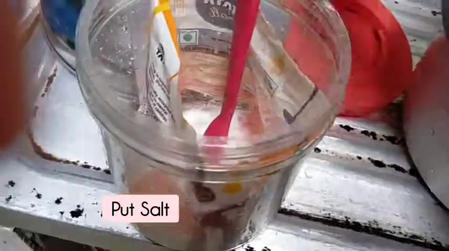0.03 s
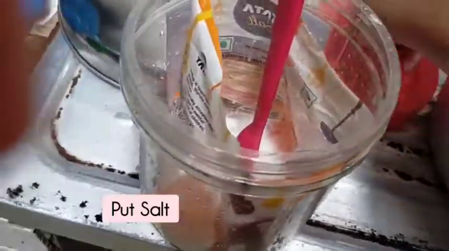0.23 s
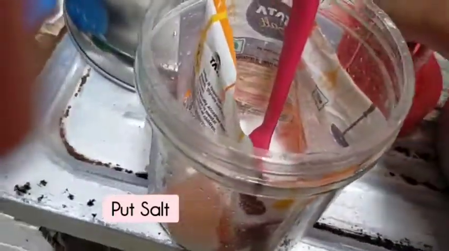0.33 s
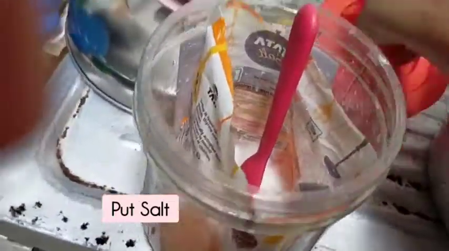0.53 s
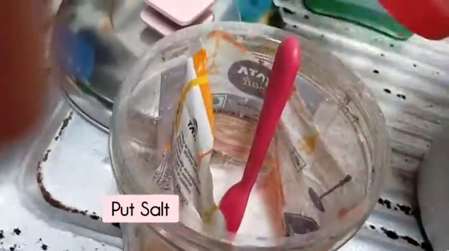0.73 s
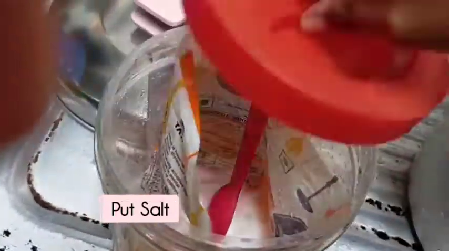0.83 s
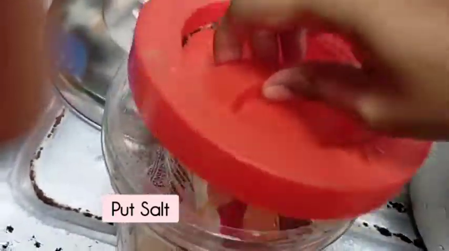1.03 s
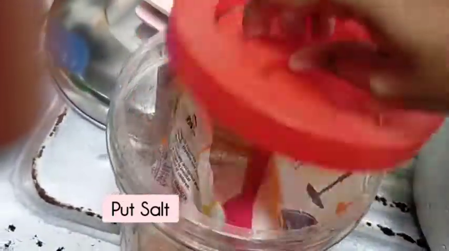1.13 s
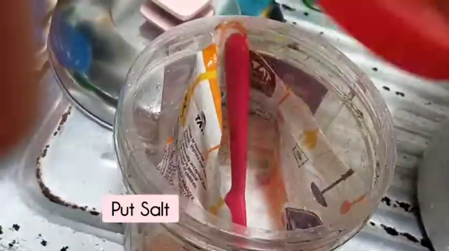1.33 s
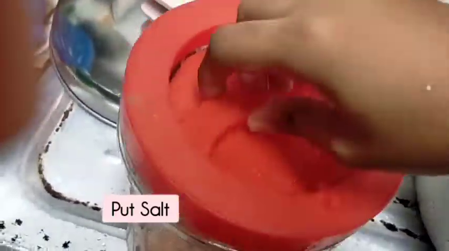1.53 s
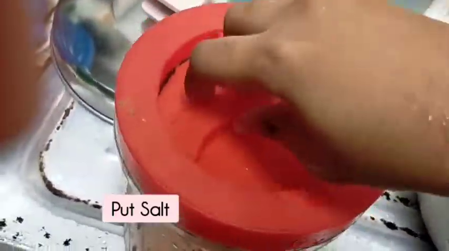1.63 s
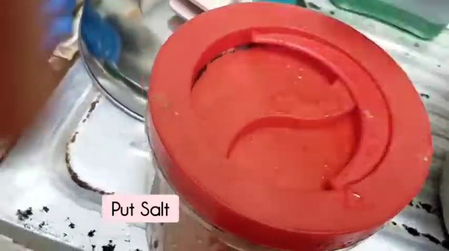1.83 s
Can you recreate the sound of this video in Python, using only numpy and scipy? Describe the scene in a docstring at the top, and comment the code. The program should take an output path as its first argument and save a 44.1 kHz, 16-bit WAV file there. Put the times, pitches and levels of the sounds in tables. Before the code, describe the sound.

A plastic lid scrapes and squeaks briefly across a steel surface, clacks against the rim of a plastic jar, then is pressed on with hollow knocks and a snap. It is heard close up in a small, quiet kitchen.

```python
"""A small, quiet kitchen. A plastic lid is dragged off a steel draining board: its edge grinds over
the steel and squeaks as it sticks and slips. The lid knocks against the rim of an open plastic jar,
brushes past it, then is set on top and pressed home with a few hollow knocks and a sharp snap.
Friction is a spray of micro-slips; each knock rings lid and rim. Worktop and walls add a short tail."""
import sys
import numpy as np
from scipy import signal
from scipy.fft import rfft, irfft, next_fast_len
from scipy.io import wavfile

SR = 44100
rng = np.random.default_rng(int(sys.argv[2]) if len(sys.argv) > 2 else 0)


def dump_mix(stems):
    """Bounce the given channels to the path in sys.argv[1] as a 16-bit WAV at rate SR."""
    frames = np.atleast_2d(stems).T  # one column per channel
    limited = np.clip(frames, -1, 1)  # hard clip at full scale
    pcm = np.round(limited * 32767).astype(np.int16)
    wavfile.write(sys.argv[1], SR, pcm)


N = 83790
T = np.arange(N) / SR


def from_db(db):
    """Decibels to gain."""
    return 10 ** (np.asarray(db) / 20)


def unit_rms(x):
    """Scale to an rms of 1."""
    return x / np.sqrt(np.mean(x ** 2) + 1e-20)


def eq(x, curve):
    """Minimum-phase EQ along a curve of (f/Hz, level/dB); white noise keeps its level."""
    size = 2 * next_fast_len(N)
    hz, db = np.transpose(curve)
    log_hz = np.log(np.fft.rfftfreq(size, 1 / SR) + 1)
    gain = unit_rms(from_db(np.interp(log_hz, np.log(hz), db)))
    cepstrum = irfft(np.log(gain))
    cepstrum[1:size // 2] *= 2  # folded forward, so nothing rings ahead of a hit
    cepstrum[size // 2 + 1:] = 0
    return irfft(rfft(x, size) * np.exp(rfft(cepstrum)), size)[:N]


def decay(start, t60):
    """Envelope that jumps to 1 and dies away."""
    return (T >= start) * from_db(-60 * np.clip((T - start) / t60, 0, 10))


def struck(start, hz, t60):
    """One struck mode: a decaying sine."""
    return decay(start, t60) * np.sin(2 * np.pi * hz * (T - start))


def resonate(x, hz, t60):
    """One driven mode; white noise keeps its level."""
    radius = from_db(-60 / (t60 * SR))
    zeros = np.sqrt((1 - radius ** 2) / 2) * np.array([1, 0, -1])
    poles = [1, -2 * radius * np.cos(2 * np.pi * hz / SR), radius ** 2]
    return signal.lfilter(zeros, poles, x + 1e-18)


def wobble(rate_hz):
    """Random modulator gliding between values of spread 1."""
    return np.interp(T * rate_hz, np.arange(N), rng.standard_normal(N))


def grains(per_s=6000, spread_db=2.5):
    """Dense, uneven micro-slips of friction; rms 1."""
    sizes = from_db(spread_db * np.minimum(rng.exponential(1, N), 4)) * rng.choice([-1, 1], N)
    return unit_rms(sizes * (rng.random(N) < per_s / SR))


# EQ of the kitchen's background: f/Hz, level/dB
ROOM_TONE_EQ = [(25, 2.5), (55, -0.5), (85, -3.5), (140, -1), (220, -7.5), (350, -3), (1400, -12),
                (2600, -16.5), (4300, -25.5), (5200, -33), (7700, -27.5), (9500, -37.5), (12500, -33),
                (15200, -25)]


def room_tone():
    """A faint, steady bed of dark noise."""
    return from_db(-56.5) * eq(rng.standard_normal(N), ROOM_TONE_EQ)


# how hard the lid rubs on the steel: t/s, grind level/dB, hiss level/dB
DRAG = [(0.199, -65.5, -80), (0.214, -34.5, -46), (0.223, -41.5, -48), (0.23, -28.5, -31),
        (.255, -31.5, -37.5), (0.271, -39, -45), (.32, -38.5, -49.5), (0.332, -28, -49), (0.345, -40, -66),
        (.398, -45.5, -81), (0.427, -46, -46), (0.438, -30, -28), (.452, -31.5, -37), (0.467, -40.5, -48),
        (0.519, -46, -78)]
# EQ of the grind: f/Hz, level/dB
GRIND_EQ = [(40, -37.5), (140, 0), (250, -3.5), (400, -4), (560, 5), (950, 1), (1900, -1.5), (2800, -7),
            (5200, -34), (7700, -40), (11000, -59)]
# resonances of lid and board: f/Hz, level/dB, t60/s
BOARD_MODES = [(141, -12.5, 0.11), (593, -15.5, 0.078), (705, -26, 0.29), (855, -16.5, 0.04),
               (1050, -16, 0.048), (1186, -8, 0.048), (1820, -8, 0.027)]
# bright EQ of the tiny slips, in the scrape's hiss and in the squeaks: f/Hz, level/dB
RASP_EQ = [(1500, -24), (3500, -22), (5500, -5), (7600, 16.5), (9200, 5), (12000, -0.5), (15000, 14.5)]


def scrape():
    """The lid's edge grinds and hisses over the steel and shakes the resonances of both."""
    times, *levels = np.transpose(DRAG)
    grind, hiss = [from_db(np.interp(T, times, db, left=-120, right=-120)) for db in levels]
    friction = grind * grains()
    body = sum(from_db(db) * resonate(friction, hz, t60) for hz, db, t60 in BOARD_MODES)
    return from_db(3) * eq(friction, GRIND_EQ) + body + eq(hiss * grains(), RASP_EQ)


# squeak cues: t/s, length/s, level/dB, f/Hz, rasp relative to the squeak/dB, catch level/dB
SQUEAKS = [(.208, 0.012, -35, 1825, -15.5, -55), (.2255, 0.011, -17, 1758, -22.5, -54),
           (0.2375, 0.0089, -17, 1742, -14.5, -39), (.2505, 0.004, -13, 1791, -16, -32.5),
           (.287, 0.0058, -25, 1820, -14.5, -41), (.3265, 0.0038, -17.5, 1803, -32, -30.5),
           (.349, 0.0036, -26, 1876, -34, -37.5), (.374, 0.006, -27, 1841, -34, -35),
           (.4352, 0.0025, -24.5, 1802, -13, -21), (.4385, 0.0056, -12, 1771, -25, -42),
           (.4475, 0.0022, -20, 1830, -5, -28)]
# EQ of the click as the edge catches: f/Hz, level/dB
CATCH_EQ = [(1000, -2), (2900, 6), (4300, -0.5), (6000, -14), (11000, -39)]


def squeaks(attack_s=0.002, release_s=0.0013, pitch_jitter=0.03, flutter_db=1.5):
    """The edge catches with a click, then sticks and slips: a wavering tone with one tiny slip a cycle."""
    level, rasp, catch = np.zeros((3, N))
    starts, _, _, pitches, _, _ = np.transpose(SQUEAKS)
    hz = np.interp(T, starts, pitches) * (1 + pitch_jitter * wobble(500))
    cycles = np.cumsum(hz) / SR
    for start, length, db, _, rasp_db, catch_db in SQUEAKS:
        attack = np.clip((T - start) / attack_s, 0, 1)
        release = np.exp(-np.maximum(T - start - length, 0) / release_s)
        grip = from_db(db) * attack * release
        level = np.maximum(level, grip)
        rasp += from_db(rasp_db) * grip
        catch += from_db(catch_db) * decay(start, t60=0.032)
    tone = level * from_db(flutter_db * wobble(400)) * np.sin(2 * np.pi * cycles)
    pulses = np.diff(np.floor(cycles), prepend=0)
    slips = unit_rms(pulses * (1 + .5 * rng.standard_normal(N)))
    return tone + eq(rasp * slips, RASP_EQ) + eq(catch * rng.standard_normal(N), CATCH_EQ)


# lid hits jar: t/s, ring f/Hz, then level/dB of ring, thump, rim, clack and snap
KNOCKS = [(0.9103, 438.4, -27, -43, -26, -26.5, -38), (0.9219, 422, -43, -34, -32, -34.5, -58),
          (.934, 440, -36, -51, -47, -41, -42), (1.4388, 400, -20.5, -22, -41.5, -26.5, -44),
          (1.458, 355, -25, -49, -62, -34, -47), (1.527, 333, -35.5, -38, -50, -27, -58),
          (1.531, 325, -21, -31.5, -39.5, -53, -29), (1.5734, 337, -42, -38, -72, -63, -37.5),
          (1.6306, 345, -31.5, -30.5, -44, -34, -39), (1.659, 442, -37.5, -31, -38, -35, -45)]
# hollow ring of the lid over the jar: multiple of the ring pitch, level/dB, t60/s
LID_MODES = [(1, 1.5, 0.067), (1.39, -20.5, 0.17)]
# modes of the open jar's rim: f/Hz, level/dB
RIM_MODES = [(570, 1), (710, -4), (895, 0.5), (1240, -9.5)]
# dense wall modes of the plastic, as an EQ: f/Hz, level/dB
CLACK_EQ = [(100, -12), (450, 9), (850, -11), (1500, 5.5), (2200, -2), (3000, -4.5), (4500, -18),
            (8000, -25.5), (12000, -71.5)]
# crisp top of the plastic's edge: f/Hz, level/dB
SNAP_EQ = [(1000, 1.5), (3800, 3.5), (5200, -5), (6800, 1.5), (7900, 8), (9300, -8.5), (12000, -4),
           (15000, 6)]
SNAP_T60_S = 0.016


def knocks(side_wall_hz=1520, thump_ratio=0.44, thump_lag_s=0.00473):
    """Each hit rings lid and rim, layered with a thump, a wall clack and a snap; rim ticks join in."""
    body, snap = rim_ticks()
    clack = np.zeros(N)
    for start, hz, ring_db, thump_db, rim_db, clack_db, snap_db in KNOCKS:
        for ratio, db, t60 in LID_MODES:
            body += from_db(ring_db + db) * struck(start, hz * ratio, t60)
        for k, (rim_hz, db) in enumerate(RIM_MODES):  # alternating polarity
            body -= (-1) ** k * from_db(rim_db + db) * struck(start, rim_hz, t60=0.027)
        # the lid's side wall keeps its pitch wherever it is held
        body += from_db(ring_db - 23) * struck(start, side_wall_hz, t60=0.022)
        body += from_db(thump_db) * struck(start + thump_lag_s, hz * thump_ratio, t60=0.053)
        clack += from_db(clack_db) * decay(start, t60=0.034)
        snap += from_db(snap_db) * decay(start, SNAP_T60_S)
    low_cut = signal.butter(2, 90, "high", fs=SR, output="sos")  # a small jar radiates no deep bass
    body = signal.sosfilt(low_cut, body)
    return body + eq(clack * rng.standard_normal(N), CLACK_EQ) + eq(snap * rng.standard_normal(N), SNAP_EQ)


# light touches on the rim: t/s, level/dB, resonance f/Hz
RIM_TICKS = [(0.9103, -40, 4700), (1.1883, -46.5, 3900), (1.2046, -38, 14770), (1.332, -50.5, 14500),
             (1.549, -46, 5670), (1.631, -28, 15100), (1.792, -50, 8100)]


def rim_ticks():
    """Noise bursts ring a broad resonance of the spot touched; returns that ring and a snap envelope."""
    ring, snap = np.zeros((2, N))
    for start, db, hz in RIM_TICKS:
        burst = decay(start, SNAP_T60_S)
        ring += from_db(db) * resonate(burst * rng.standard_normal(N), hz, t60=0.0058)
        snap += from_db(db + 1) * burst
    return ring, snap


# the lid slides over the rim: peak t/s, half width/s, rub level/dB, hiss level/dB
RUBS = [(0.966, 0.017, -53.5, -56), (1.028, 0.019, -52, -74), (1.202, 0.015, -59.5, -54),
        (1.28, 0.017, -67.5, -57.5), (1.468, 0.012, -46.5, -53), (1.531, 0.013, -42.5, -50),
        (1.568, 0.048, -53.5, -58), (1.634, 0.0051, -41.5, -52)]
# low resonances under the rubs: f/Hz, level/dB, t60/s
RUB_MODES = [(111.4, -3.5, 0.1), (172, -4.5, 0.14), (394, -1.5, 0.033)]


def rubs():
    """Soft, bell-shaped swells of plastic sliding on plastic around the knocks."""
    rub, hiss = np.zeros((2, N))
    for peak, half_width, rub_db, hiss_db in RUBS:
        swell = np.exp(-np.minimum(((T - peak) / half_width) ** 2, 100) / 2)
        rub += from_db(rub_db) * swell
        hiss += from_db(hiss_db) * swell
    friction = rub * grains()
    body = sum(from_db(db) * resonate(friction, hz, t60) for hz, db, t60 in RUB_MODES)
    return eq(friction, CLACK_EQ) + body + eq(hiss * grains(), SNAP_EQ)


def reflections(predelay_s, db, t60):
    """Impulse response of dense echoes: decaying noise with a total gain of db."""
    return from_db(db) * unit_rms(decay(predelay_s, t60) * rng.standard_normal(N)) / np.sqrt(N)


# warm EQ on the reverb return: f/Hz, level/dB
REVERB_EQ = [(250, 2), (1000, 0), (1800, -1.5), (3500, -1.5)]


def kitchen_reverb(x, damping_hz=7800):
    """Quick reflections from the worktop and a short tail from the walls, which return little treble."""
    worktop = reflections(predelay_s=.003, db=-17, t60=0.11)
    walls = reflections(predelay_s=.012, db=-13, t60=0.26)
    response = worktop + signal.lfilter(*signal.butter(1, damping_hz, fs=SR), walls)
    return eq(signal.fftconvolve(x, response)[:N], REVERB_EQ)


def scene():
    """Lid and jar up close, over the kitchen's room tone and reverb; mono."""
    handling = scrape() + squeaks() + knocks() + rubs()
    return (room_tone() + handling + kitchen_reverb(handling))[None]


def record(dry):
    """A steep high cut at 15750 Hz on the mix."""
    return signal.sosfilt(signal.ellip(12, .2, 80, 15750, fs=SR, output="sos"), dry)


dry = scene()
out = record(dry)
dump_mix(out)
```